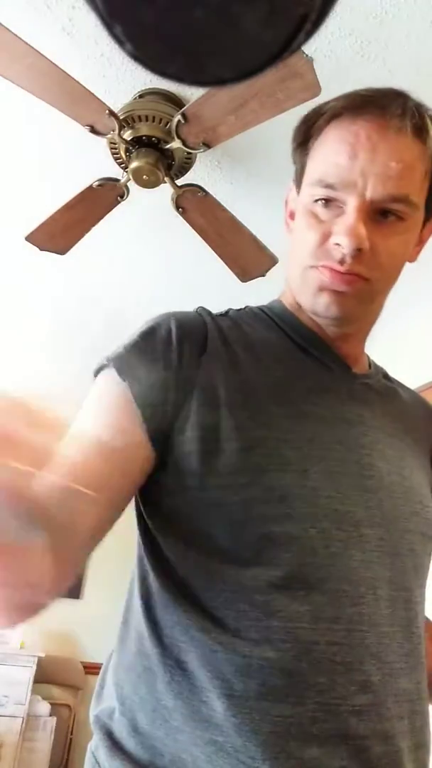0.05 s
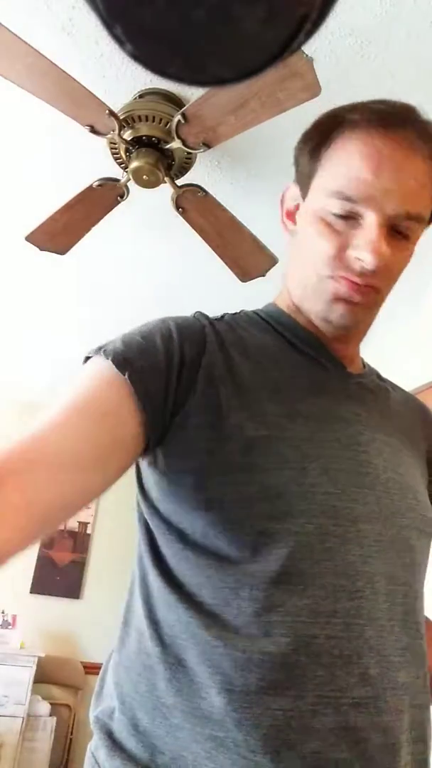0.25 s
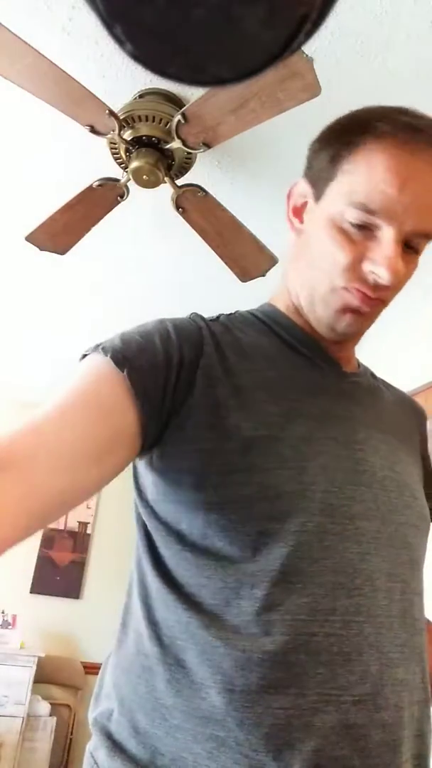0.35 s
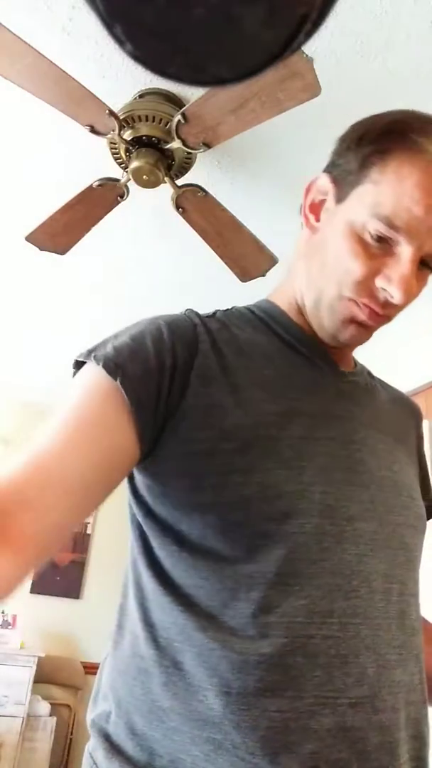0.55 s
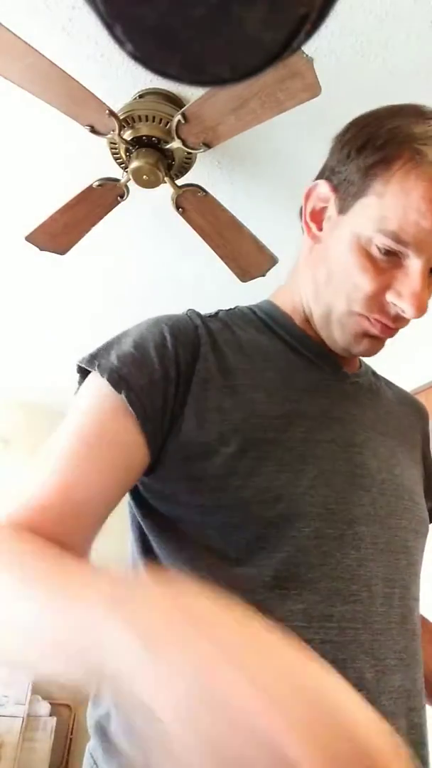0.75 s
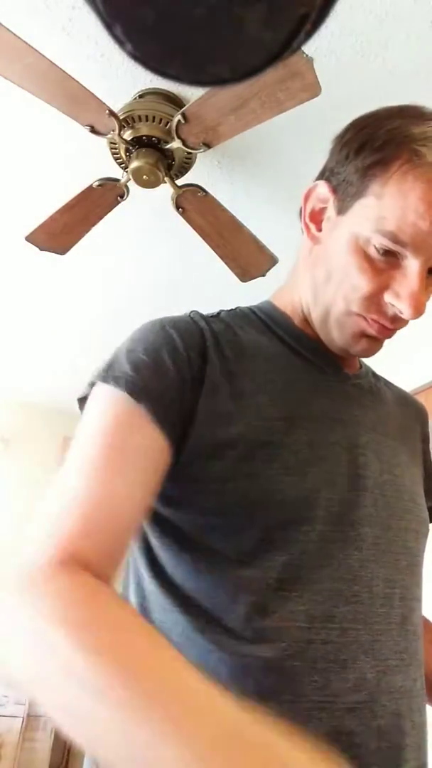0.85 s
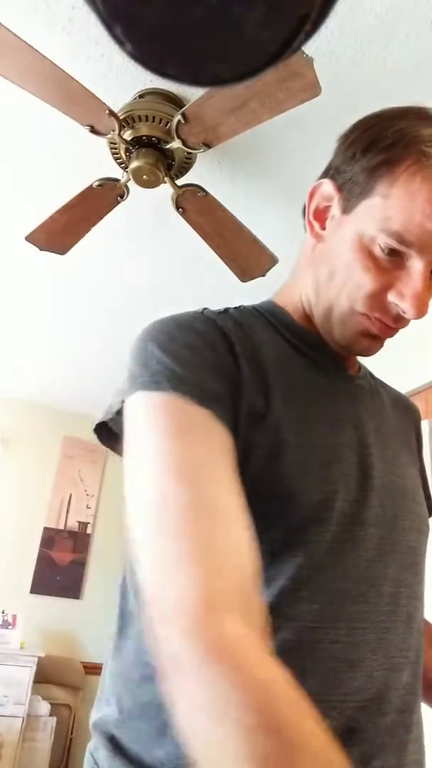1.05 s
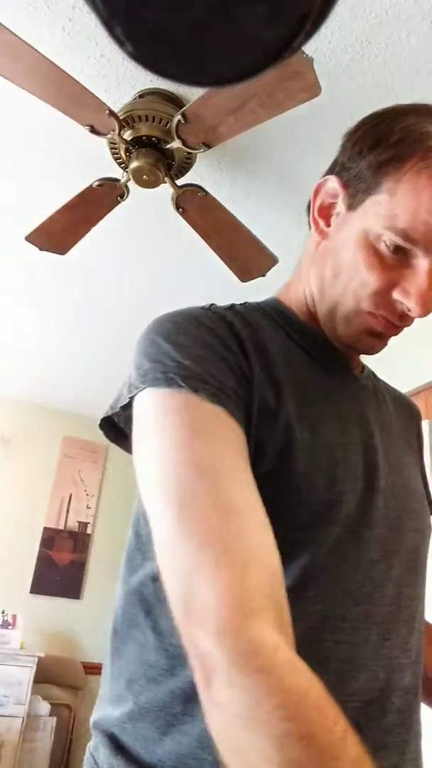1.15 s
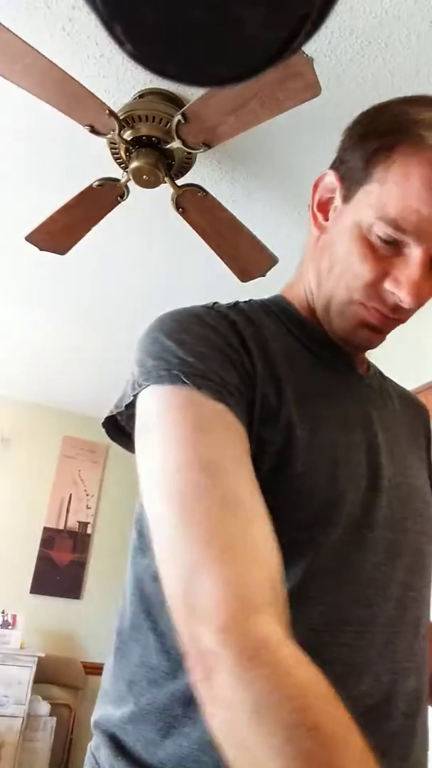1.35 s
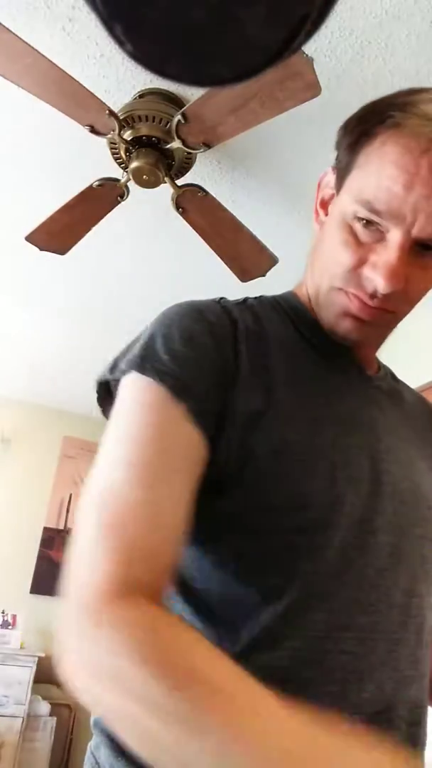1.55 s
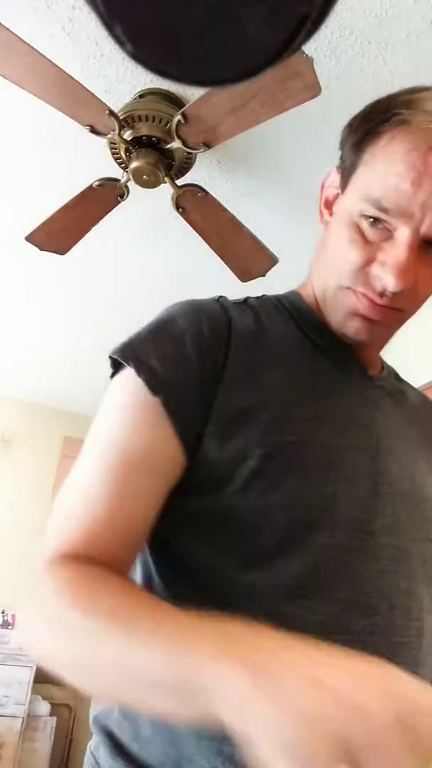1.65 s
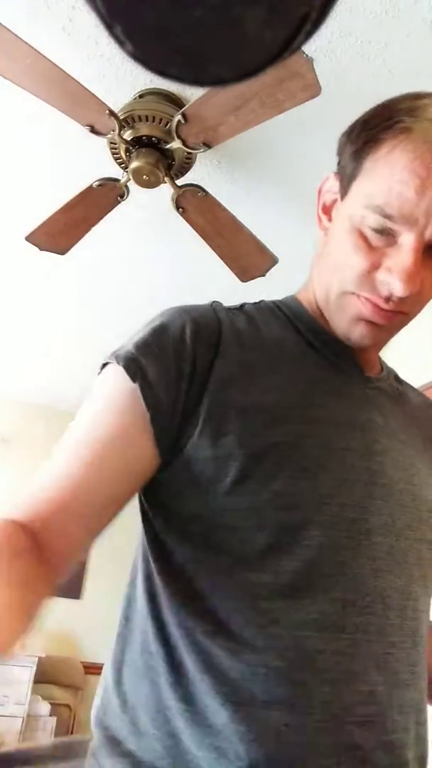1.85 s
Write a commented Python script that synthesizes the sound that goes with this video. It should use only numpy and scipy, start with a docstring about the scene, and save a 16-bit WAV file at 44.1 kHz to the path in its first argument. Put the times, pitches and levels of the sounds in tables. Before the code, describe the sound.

Steel cutlery lands on a plate in a quick, bright clatter, a glass singing along, then a lighter dish is softly knocked about. Close to the microphone in a kitchen with fridge hum and faint hiss.

```python
"""Steel cutlery is dropped on a plate beside a phone on a kitchen counter: fading sines make its ring, small
contacts shaking the plate's resonances make the clacks, and short pulses through the counter jolt the left
microphone. A glass sings along, things scrape as they settle, and later a hand knocks a lighter dish about.
A fridge hums in wavering sines under the room's filtered-noise hiss; the whole level sinks for a while."""
import sys
import numpy as np
from scipy import signal
from scipy.fft import rfft, irfft, next_fast_len
from scipy.io import wavfile
from scipy.ndimage import uniform_filter1d

SR = 44100
rng = np.random.default_rng(int(sys.argv[2]) if len(sys.argv) > 2 else 0)


def to_wav(s):
    """Save 16-bit WAV."""
    ch = np.atleast_2d(s).T  # columns
    pcm = np.round(np.clip(ch, -1, 1) * 32767)  # PCM
    wavfile.write(sys.argv[1], SR, pcm.astype(np.int16))


def undo_db(level):
    """Turn decibels back into plain size, where 20 dB means ten times bigger."""
    steps = np.asarray(level, float) / 20
    return 10 ** steps


N = 83790  # length in samples
LEFT_LAG_S = 0.000244  # how much later the left microphone hears
TOP_HZ = 15750  # highest pitch of the clinks and of the microphones

# tone colour of hard clinks and scrapes: (frequency [Hz], level [dB])
CRACK_COLOUR = [(300, -120), (800, -6.5), (2500, -2.5), (8000, -8), (15500, -17)]


def unit(x):
    """Scale to an rms of 1."""
    return x / np.sqrt(np.mean(x ** 2) + 1e-20)


def along(points, hz):
    """Read a curve of (Hz, value) points, with frequency on a log axis."""
    point_hz, value = np.transpose(points)
    return np.interp(np.log(hz + 1), np.log(point_hz + 1), value)


def curve(rows):
    """Join (s, value) points with straight lines, one value per sample."""
    return np.interp(np.arange(N) / SR, *np.transpose(rows))


def filtered(x, response):
    """Shape x by a gain (it may be complex) that depends on frequency."""
    m = next_fast_len(x.shape[-1] + SR // 4)
    spectrum = rfft(x, m) * response(np.fft.rfftfreq(m, 1 / SR))
    return irfft(spectrum, m)[..., :x.shape[-1]]


def add(out, s, x):
    """Mix a stereo sound into out, starting at s seconds."""
    tail = out[:, round(s * SR):]
    tail[:, :x.shape[1]] += x[:, :tail.shape[1]]


def sides(db):
    """Left and right gains for a left-over-right level in dB."""
    return undo_db([[db / 2], [-db / 2]])


def ring(out, hit, hz, level_db, t60):
    """Struck things ring in fading sines (modes), roughened throughout by chatter, damped more once settled."""
    s, db, pan_db, free_s = hit
    t = np.arange(SR // 2) / SR

    # 45 weak modes with random pitch, level and decay join the given ones
    weak = rng.random((3, 45))
    hz = np.r_[hz, 1500 + 14000 * weak[0]][:, None]
    level_db = np.r_[level_db, -16 - 10 * weak[1]][:, None]
    t60 = np.r_[t60, .05 + .22 * weak[2]][:, None]

    # the microphones' phases differ by about a quarter turn; the first term offsets the left one's lag
    spread = .6 * rng.standard_normal((len(hz), 1))  # radians
    apart = np.pi * hz * LEFT_LAG_S + (np.pi / 2 + spread) / 2
    phase = 2 * np.pi * rng.random((len(hz), 1)) + np.array([apart, -apart])
    scatter_db = 1.5 * rng.standard_normal((2, len(hz), 1))  # level differs in each microphone

    # chatter: smoothed random steps, one set for loudness and one for phase
    chatter_depth, chatter_hz = .45, 70
    knots = rng.standard_normal((2, len(hz), SR // 200))
    steps = knots[:, :, (t * chatter_hz).astype(int)]
    chatter = chatter_depth * uniform_filter1d(steps, round(SR / chatter_hz), -1)

    size = undo_db(level_db + scatter_db - 60 * t / t60) * (1 + chatter[0])
    modes = size * np.sin(2 * np.pi * hz * t + phase + chatter[1])
    swell_s, settled_t60 = .0015, 0.34
    swell = 1 - np.exp(-t / swell_s)
    damping = undo_db(-60 * np.maximum(t - free_s, 0) / settled_t60)  # extra damping once lying
    add(out, s, undo_db(db) * sides(pan_db) * modes.sum(1) * swell * damping)


def spoon():
    """A spoon has fixed mode pitches, but the struck spot decides how loud each one is."""
    # pitch of each mode [Hz]
    spoon_hz = [1794, 3330, 5907, 7390, 8510, 9734, 10420, 11140, 13200, 14402, 15388]
    # its modes: (t60 [s], level struck on the handle [dB], on the bowl [dB], on the neck [dB])
    spoon_modes = [(0.22, -37.5, -25, -6.5), (0.3, -27.5, -20.5, -12), (0.44, -15.5, -14.5, -11),
                   (0.46, -8.5, -10.5, -18.5), (0.42, -19.5, -10.5, 1.5), (0.37, -31, -13.5, -14),
                   (0.075, -29.5, -35, -7.5), (0.44, -12.5, -28.5, -14.5), (.2, -21, -3.5, -2.5),
                   (0.067, -2.5, 3.5, -10.5), (.25, -3.5, -12.5, 2)]
    # one blow per spot, in that order: (time [s], level [dB], left over right [dB], time until settled [s])
    spoon_hits = [(0.271, -26.5, 18.5, 0.0069), (.355, -12.5, 6.5, 0.021), (0.5121, -11.5, 3, 0.12)]
    out = np.zeros((2, N))
    t60, *spots = np.transpose(spoon_modes)
    for hit, level_db in zip(spoon_hits, spots):
        ring(out, hit, spoon_hz, level_db, t60)
    return out


def fork():
    """A fork rings in its own modes when struck."""
    # its modes: (frequency [Hz], level [dB], t60 [s])
    fork_modes = [(5459, -8, .15), (6961, -4, .2), (8726, -13, .1), (11250, -8, .07), (13153, -3, .16),
                  (15210, -14, .2)]
    # blows: (time [s], level [dB], left over right [dB], time until settled [s])
    fork_hits = [(0.469, -19.5, 21.75, 0.031)]
    out = np.zeros((2, N))
    for hit in fork_hits:
        ring(out, hit, *np.transpose(fork_modes))
    return out


def glass():
    """A glass nearby is set singing in two long modes, over the many weak ones."""
    # its modes: (frequency [Hz], level [dB], t60 [s])
    glass_modes = [(3160, -7, .7), (3929, 0, 1.5)]
    # its one start: (time [s], level [dB], left over right [dB], time until settled [s])
    glass_hit = (0.4, -24.5, -3.5, 0.24)
    out = np.zeros((2, N))
    ring(out, glass_hit, *np.transpose(glass_modes))
    return out


def crockery_response(f, modes, favoured_hz):
    """Resonances of alternating sign; each is 1 dB weaker per octave away from the favoured pitch."""
    total = 0
    for k, (centre, width, db) in enumerate(modes):
        gain = undo_db(db - abs(np.log2(centre / favoured_hz)))
        peak = 1j * f * width / (centre * centre - f * f + 1j * f * width)
        total = total + (-1) ** k * gain * peak
    return total


def clinks(t, t60):
    """The crack of a blow: 240 sines of uneven strength, each fading at its own speed."""
    u = rng.random((4, 240, 1))
    hz = TOP_HZ * u[0]
    uneven_db = 4 * rng.standard_normal(hz.shape)
    size = undo_db(along(CRACK_COLOUR, hz) + uneven_db - 60 * t * 2 * u[1] / t60)
    crack = np.array([(size * np.sin(2 * np.pi * (hz * t + p))).sum(0) for p in u[2:]])
    return crack * undo_db(-60 * t / t60) / np.std(crack[:, :SR // 200])


def clacks(contacts, body, shared, blow, pan_db):
    """A blow and a dying rattle of small contacts shake the crockery's resonances, with a crack of clinks."""
    out, t = np.zeros((2, N)), np.arange(SR // 4) / SR
    for s, body_db, crack_db, favoured_hz, t60 in contacts:
        a = rng.standard_normal((4, len(t)))
        # the resonances shift a little from blow to blow
        modes = [(c * (1 + .022 * u), w, db) for (c, w, db), u in zip(body, a[3])]
        # small contacts at 6 % of the samples, partly shared by the two sides
        rattle = (shared * a[0] + a[1:3]) * (rng.random(len(t)) < .06)
        rattle[:, 0] = blow
        knock = filtered(rattle * undo_db(-60 * t / t60), lambda f: crockery_response(f, modes, favoured_hz))
        knock = 2 * knock / np.abs(knock).max()
        add(out, s, sides(pan_db) * (undo_db(body_db) * knock + undo_db(crack_db) * clinks(t, t60)))
    return out


def plate():
    """The cutlery lands and bounces on the plate, shaking its resonances."""
    # resonances: (frequency [Hz], width [Hz], level [dB])
    plate_body = [(457, 67, 2), (756, 50, 4.5), (1600, 290, -5.5), (2000, 300, -1.5), (2380, 57, 7.5),
                  (2855, 280, -5.5)]
    # contacts: (time [s], body level [dB], steel crack level [dB], favoured pitch [Hz], t60 [s])
    plate_contacts = [(.2395, -4, -30.5, 1900, 0.14), (.267, -17.5, -11.5, 2365, 0.062),
                      (.290, -22, -26, 706, 0.12), (.327, -12.5, -18, 2006, 0.13),
                      (.354, -24.5, -24, 2033, 0.17), (.374, -13, -18.5, 1867, 0.29),
                      (.470, -22, -22, 1183, 0.38), (.511, -19.5, -22.5, 1050, 0.43),
                      (.663, -37, -18, 1600, 0.1), (.787, -34.5, -36.5, 1600, 0.12)]
    return clacks(plate_contacts, plate_body, shared=0.71, blow=6.4, pan_db=1.0)


def dish():
    """A hand knocks a lighter dish about, shaking its resonances."""
    # resonances: (frequency [Hz], width [Hz], level [dB])
    dish_body = [(579.5, 70, 6), (1130, 104, 4), (2580, 240, -4), (3620, 154, -12)]
    # contacts: (time [s], body level [dB], crack level [dB], favoured pitch [Hz], t60 [s])
    dish_contacts = [(.974, -27, -43, 920, 0.092), (1.072, -21.5, -38, 885, 0.1),
                     (1.152, -36.5, -40.5, 2000, 0.193), (1.194, -16, -27, 1130, 0.044),
                     (1.241, -19, -24, 586, 0.11)]
    return clacks(dish_contacts, dish_body, shared=2.7, blow=6.7, pan_db=0.0)


def counter():
    """The counter passes on blows: sharp pulses jolt the left microphone, fading low sines thump."""
    # jolts: (time [s], signed size, width [s])
    jolts = [(0.511, 1, 0.00013), (0.5133, -0.47, 0.00023), (0.5153, 0.61, 0.00011)]
    # thumps: (time [s], left level [dB], frequency [Hz], t60 [s], right over left [dB])
    thumps = [(.515, -0.5, 55.7, 0.036, -39.5), (0.967, -24, 162, 0.073, 5), (0.982, -22.5, 232, 0.085, 3)]
    out, t = np.zeros((2, N)), np.arange(N) / SR
    for s, size, width in jolts:
        out[0] += size * np.exp(-.5 * ((t - s) / width) ** 2)
    for s, db, hz, t60, right_db in thumps:
        thump = np.sin(2 * np.pi * hz * t) * undo_db(-60 * t / t60)
        add(out, s, undo_db([[db], [db + right_db]]) * thump)
    return out


def slide():
    """Things scrape as they settle: noise of unsteady strength makes the grains."""
    # loudness of the scraping: (time [s], level [dB])
    scraping = [(.2, -128), (.25, -43), (.6, -31), (1.0, -75.5), (1.1, -53.5), (1.3, -70.5), (1.45, -82)]
    unsteady_db = 2.5 * unit(uniform_filter1d(rng.standard_normal(N), 300))
    grains = rng.standard_normal((2, N)) * undo_db(unsteady_db)
    return undo_db(curve(scraping)) * unit(filtered(grains, lambda f: undo_db(along(CRACK_COLOUR, f))))


def fridge_hum():
    """A fridge hums in a few sines whose level and phase waver slowly."""
    # sines: (frequency [Hz], peak level before wavering [dB])
    hum_lines = [(120, -29.5), (240, -35.5), (290, -42), (475, -48.5)]
    waver_hz, waver_db, waver_rad = 5, 1.2, .3
    t, hum = np.arange(N) / SR, 0
    for hz, db in hum_lines:
        slow = filtered(rng.standard_normal((2, N)), lambda f: np.exp(-.5 * (f / waver_hz) ** 2))
        phase = waver_rad * unit(slow[1]) + 2 * np.pi * rng.random()
        hum = hum + undo_db(db + waver_db * unit(slow[0])) * np.sin(2 * np.pi * hz * t + phase)
    return hum


def room_hiss():
    """The room hisses in filtered noise, more alike on both sides in the bass than in the treble."""
    # colour of the noise: (frequency [Hz], relative level per Hz [dB])
    hiss_colour = [(30, -52.5), (70, -23), (160, -16.5), (250, -27.5), (500, -27.5), (2500, -39),
                   (5000, -56), (16000, -77.5)]
    # (frequency [Hz], left-right likeness [1 = the same])
    likeness = [(250, 1), (4000, 0.11)]

    def response(f):
        turn = np.arccos(np.clip(along(likeness, f), -1, 1)) / 2
        return undo_db(along(hiss_colour, f)) * [np.cos(turn), np.sin(turn)]

    mid, side = filtered(rng.standard_normal((2, N)), response)
    return undo_db(-40) * unit(np.array([mid + side, mid - side]))


def room(x):
    """The kitchen echoes in a noise tail in which each frequency dies at its own speed."""
    # (frequency [Hz], t60 [s])
    echo_decay = [(500, 0.41), (16000, 0.28)]
    hz, t, z = signal.stft(rng.standard_normal((2, SR // 2)), SR, nperseg=256)
    fading = z * undo_db(-60 * t / along(echo_decay, hz)[:, None])
    tail = signal.istft(fading, SR, nperseg=256)[1]
    late = np.pad(x, ((0, 0), (200, 0)))  # the echo starts 200 samples late
    return signal.fftconvolve(late, tail / np.linalg.norm(tail[0]), axes=1)[:, :N]


def scene():
    """Everything on the counter, with the kitchen's echo, over hum and hiss; the whole sinks for a while."""
    # loudness of the whole scene: (time [s], level [dB])
    overall = [(.56, -2.5), (.63, -7), (1.72, -8), (1.82, -2.5)]
    near = spoon() + fork() + glass() + plate() + dish()
    echo = undo_db(-7) * room(near)
    return undo_db(curve(overall)) * (near + echo + counter() + slide() + fridge_hum() + room_hiss())


def band_limit(x):
    """A steep low-pass at the top of the band."""
    return signal.sosfilt(signal.butter(12, 16630, fs=SR, output="sos"), x)


def record(dry):
    """The left microphone hears a little later; both lose the deep bass and the top treble."""
    low_hz = 30.8

    def microphones(f):
        bass_cut = (1j * f / (low_hz + 1j * f)) ** 4
        lag = np.exp(-1j * np.pi * f * LEFT_LAG_S * np.array([[1], [-1]]))  # half the lag each way
        return bass_cut * (f < TOP_HZ) * lag

    return band_limit(filtered(dry, microphones))


dry = scene()
out = record(dry)
to_wav(out)
```